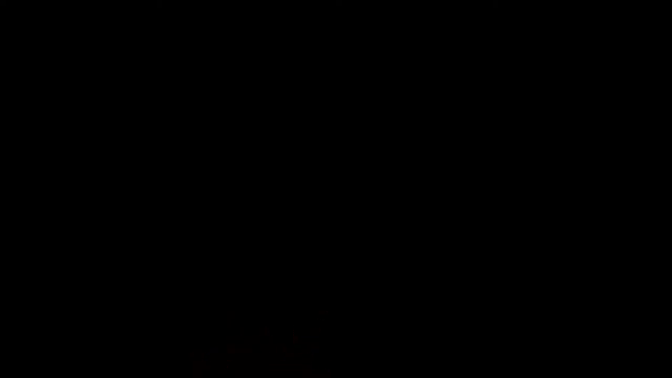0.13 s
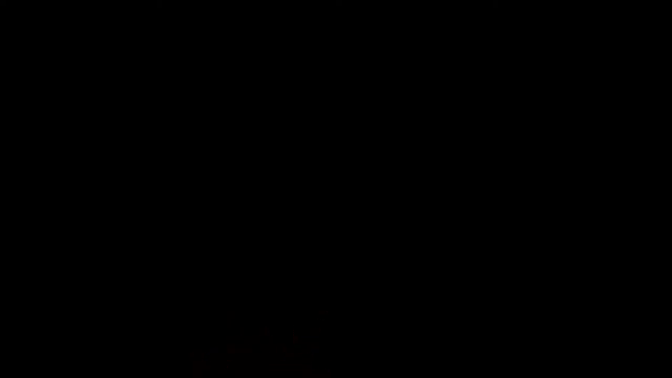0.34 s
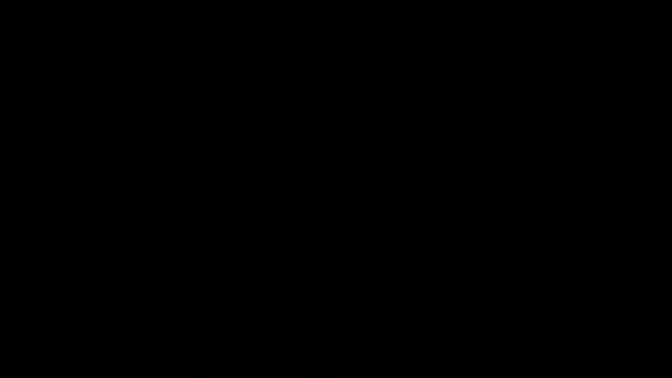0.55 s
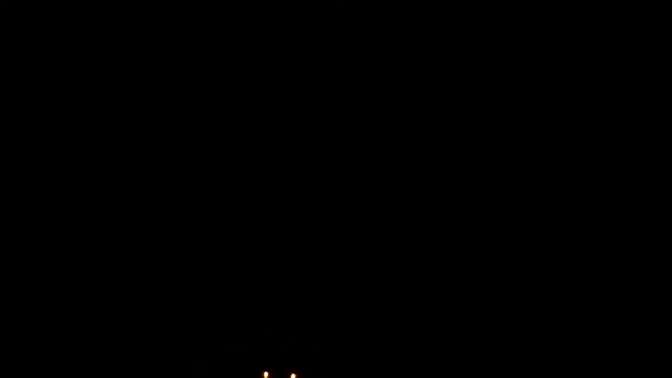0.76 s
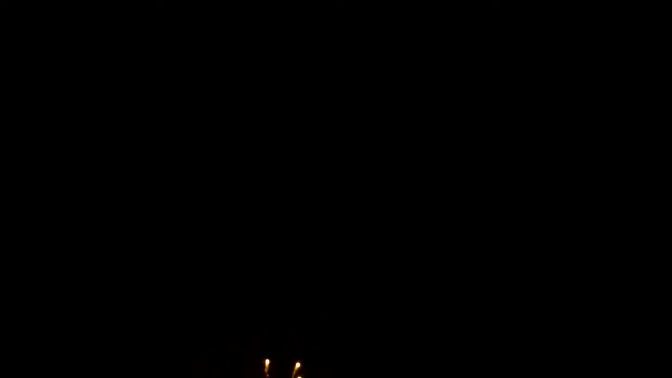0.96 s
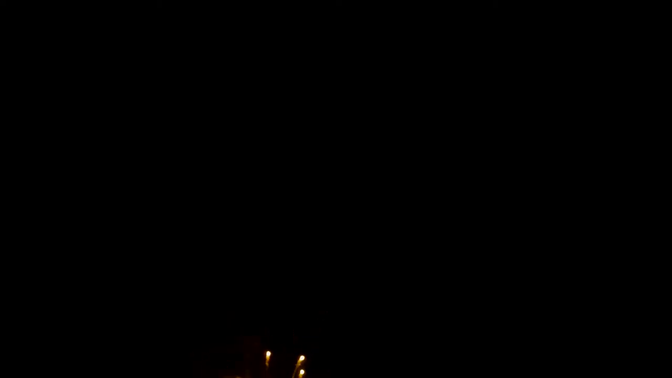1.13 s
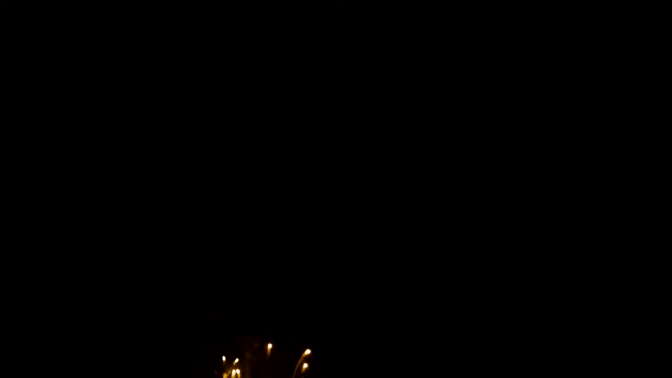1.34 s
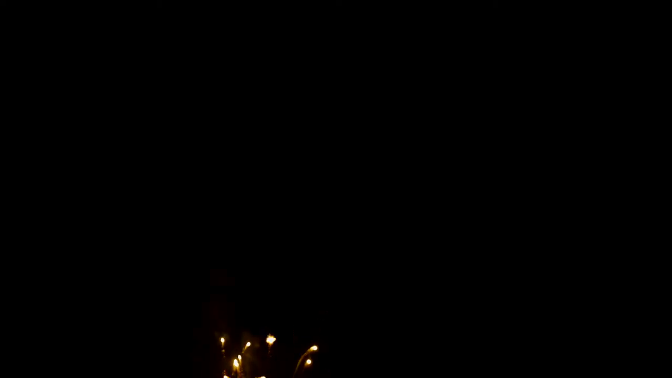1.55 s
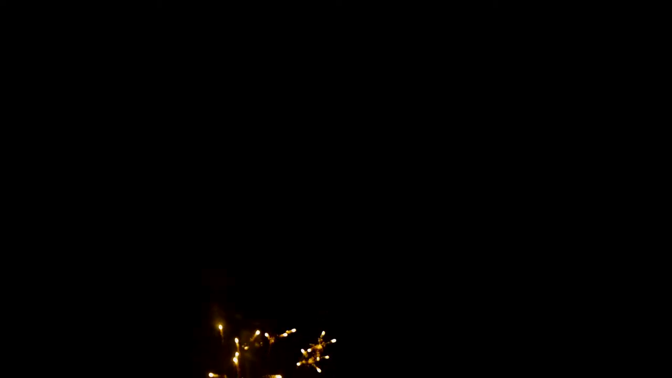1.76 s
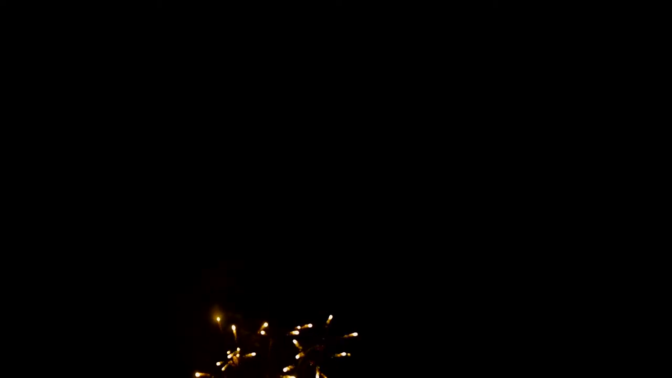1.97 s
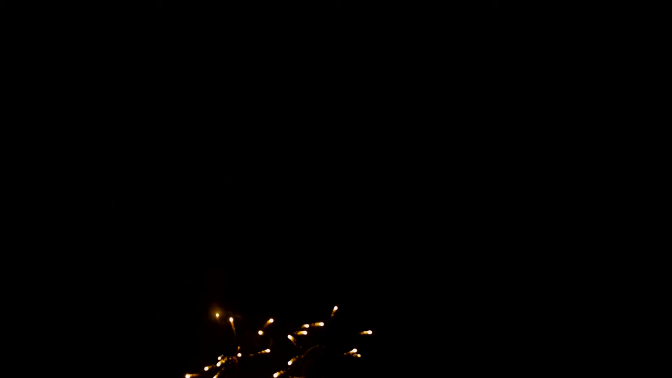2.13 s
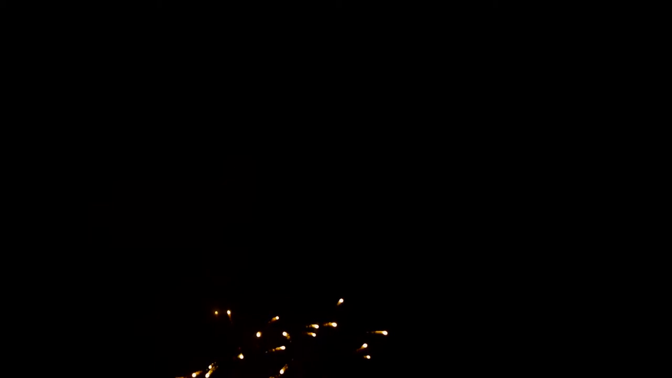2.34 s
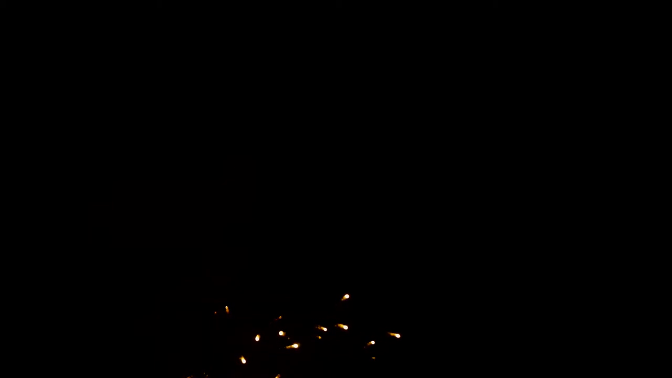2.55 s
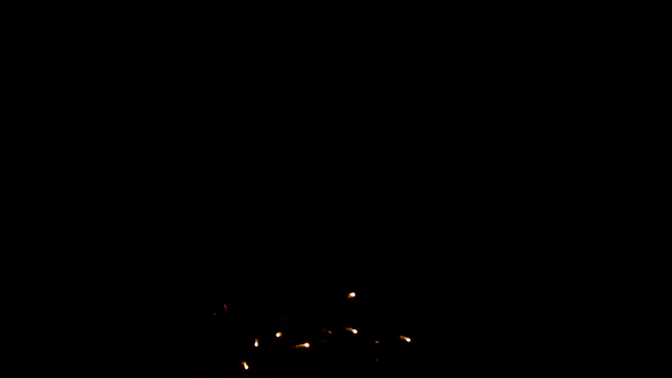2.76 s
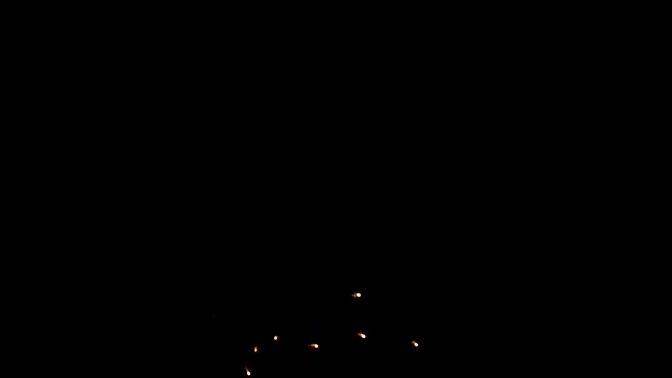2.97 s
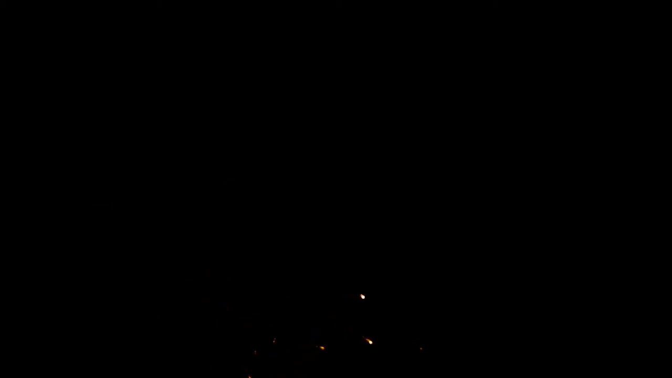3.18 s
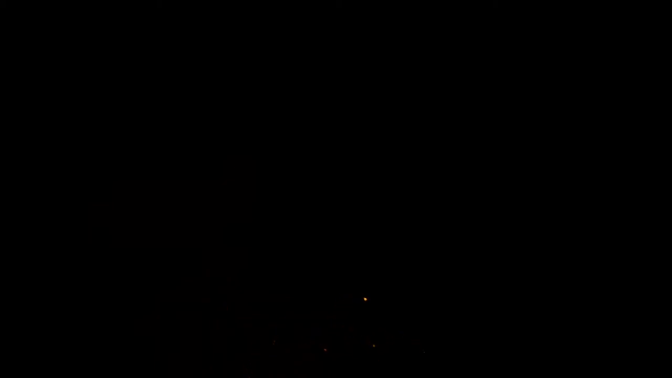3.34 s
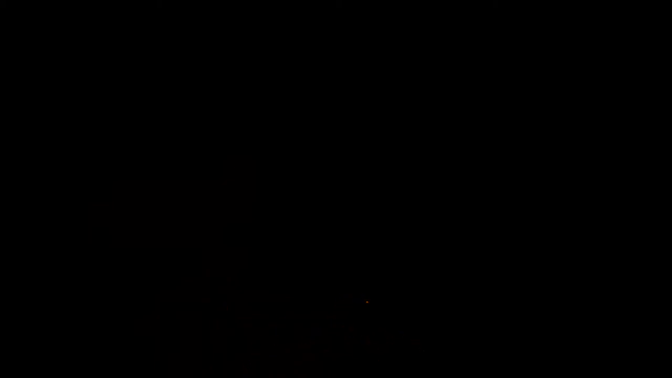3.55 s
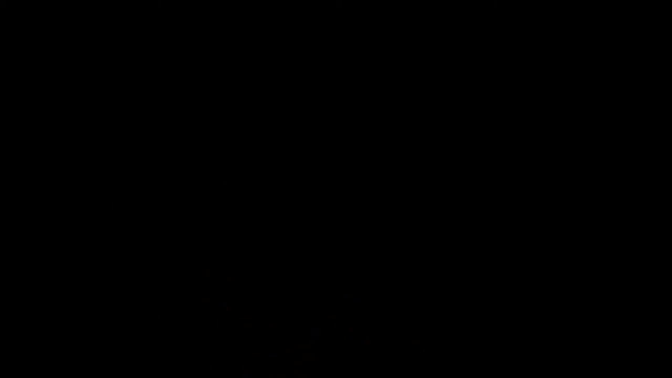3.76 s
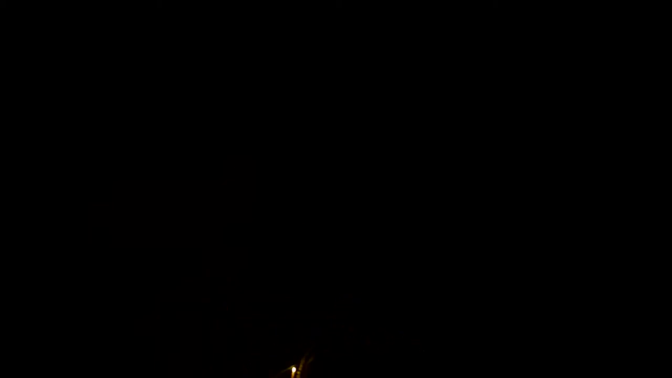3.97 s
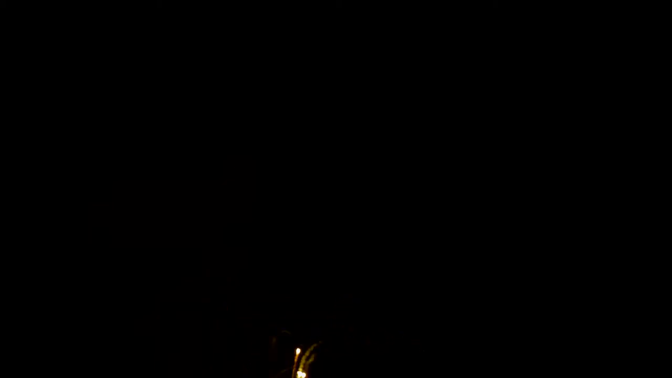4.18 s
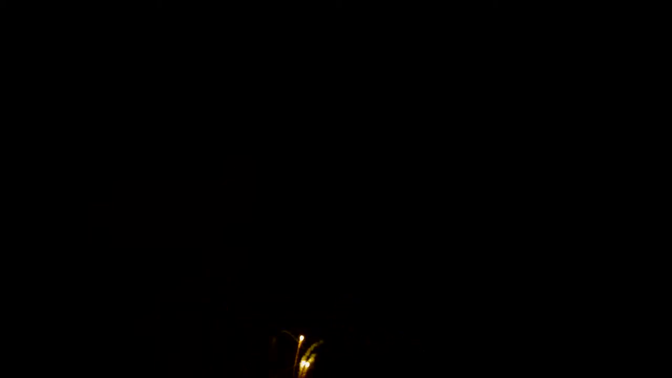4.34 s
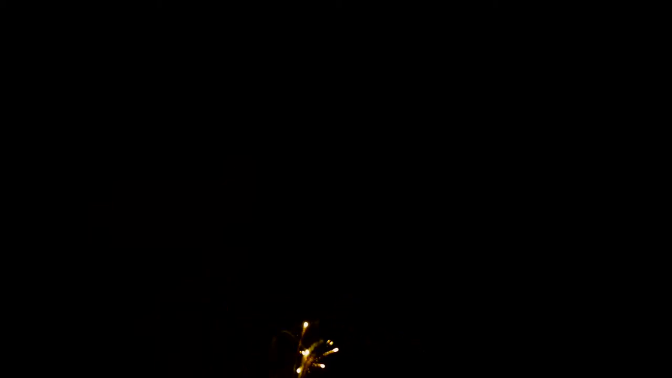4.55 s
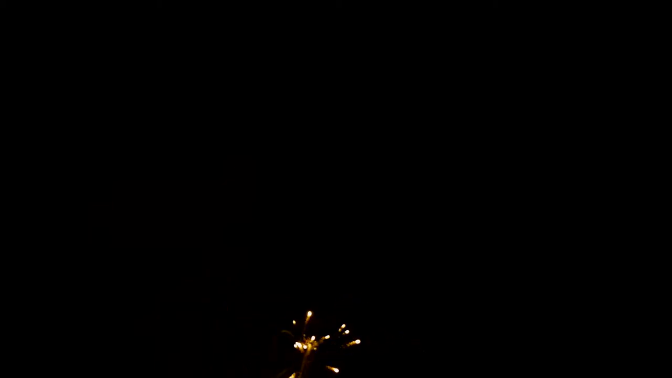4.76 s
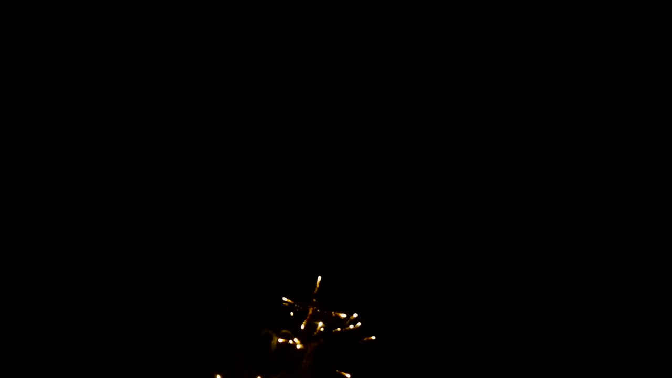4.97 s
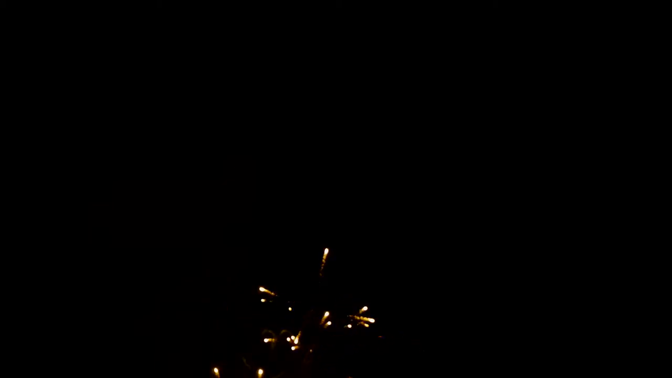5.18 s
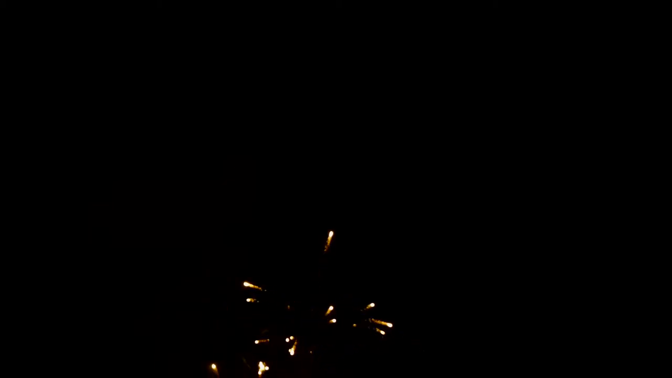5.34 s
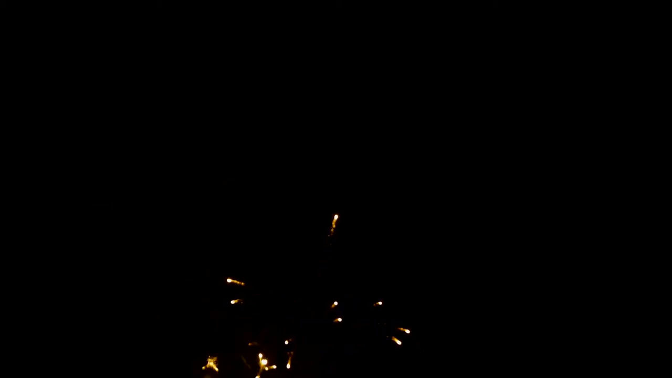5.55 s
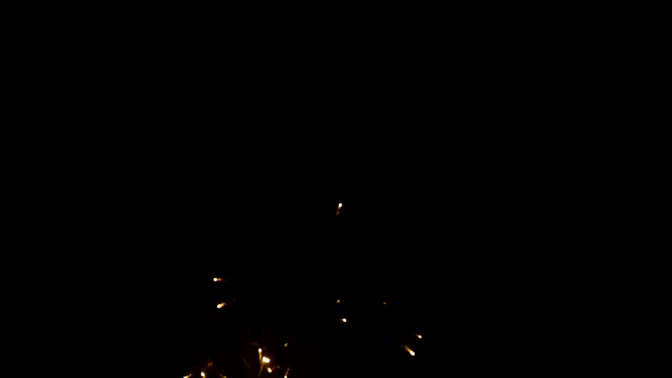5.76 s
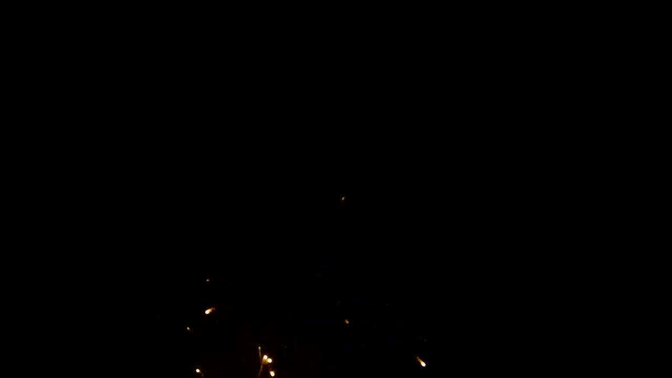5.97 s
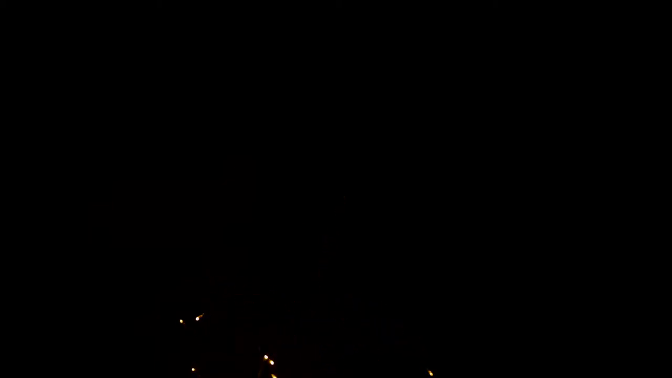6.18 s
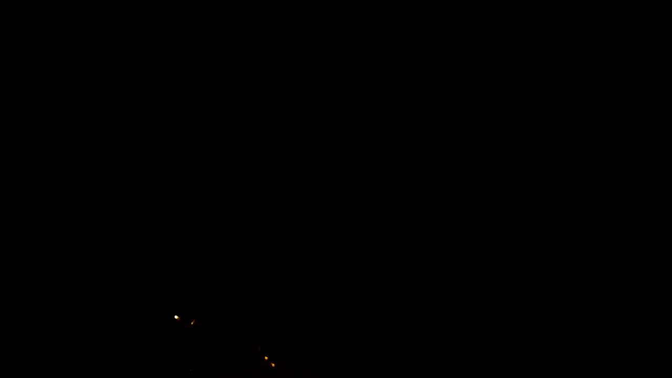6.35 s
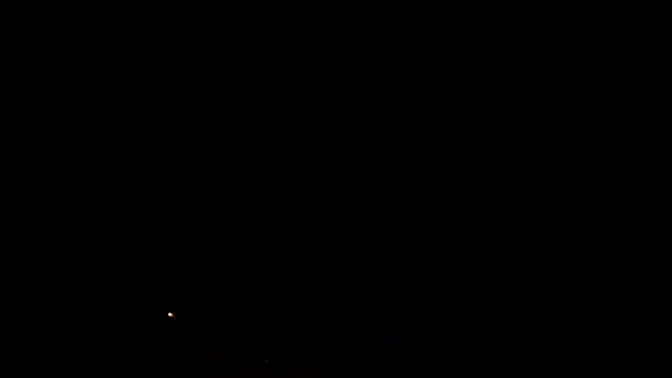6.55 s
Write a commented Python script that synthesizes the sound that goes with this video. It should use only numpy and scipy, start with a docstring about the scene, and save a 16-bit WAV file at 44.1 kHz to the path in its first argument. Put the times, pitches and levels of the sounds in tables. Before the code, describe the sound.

Fireworks pop and crack outdoors at night, heard slightly to the left. About seven sharp reports come in quick, uneven succession, followed by muffled booms from farther away. One lone crack sounds, then another flurry of stronger and weaker pops, with deep distant thuds at the end. The cracks bounce off a wall and fade softly among trees and buildings, with only faint night air behind them.

```python
"""Sharp cracks come in quick clusters: small firework shells bursting over open ground on a still night. Each
is one blast wave, doubled by ground reflection, slapped back by a wall and scattered by trees and buildings
into a long soft tail. Far-off shells thud in between, their treble absorbed by the air, and near the end a
shell's launch gives a faint pop, all over a faint outdoor rumble."""
import sys
import numpy as np
from scipy import signal
from scipy.fft import rfft, irfft, next_fast_len
from scipy.io import wavfile

SR = 44100
rng = np.random.default_rng(int(sys.argv[2]) if len(sys.argv) > 2 else 0)


def pcm_store(signal):
    """Save signal as 16-bit PCM."""
    levels = np.round(np.clip(np.atleast_2d(signal), -1, 1) * 32767)
    wavfile.write(sys.argv[1], SR, levels.astype(np.int16).T)


N = 291501

# Near bursts, the last row (6.318 s) being the faint pop of a shell's launch: start_s, level_db, length_ms,
# ground_gain, air_cutoff_hz, wall_delay_ms
NEAR_SHELLS = [ (0.7523, -18.5, 0.2, 0.56, 3940, 64), (1.0203, -16.5, .26, 0.62, 3920, 65.1),
               (1.3216, -9.5, 0.31, 0.65, 4350, 65.2), (1.4625, -14.5, 0.27, 0.6, 3950, 69.7),
               (1.5666, -11.5, 0.28, 0.55, 4300, 70.6), (1.6620, -12.5, 0.35, 1.3, 3920, 73),
               (1.9322, -10, .27, 0.64, 4000, 66.5), (3.5818, -12, 0.36, 0.63, 4000, 64.5),
               (4.4241, -10, .27, 0.58, 3990, 69), (4.7038, -11, 0.26, 0.56, 4070, 70.5),
               (4.8218, -8, 0.32, 0.72, 4200, 70.3), (4.9060, -18, 0.35, 0.55, 4040, 63.4),
               (5.0205, -16, .42, 0.93, 2840, 65.5), (5.3425, -27.5, 0.29, 0.52, 3130, 79),
               (5.4478, -16, .31, 0.48, 2500, 67), (5.6132, -10.5, 0.31, 0.65, 4110, 65),
               (6.3180, -29, 0.32, 0.34, 910, 70), ]
# Reflections from objects close by: delay_ms, gain_db
NEAR_REFLECTIONS = [(.88, -25), (2.1, -35), (3.0, -23), (9.6, -23), (11.1, -33.5), (24.5, -42)]
# Distant bursts: start_s, level_db, length_ms, air_cutoff_hz, knock_db
FAR_SHELLS = [ (2.1491, -26, 4.7, 72, -39.5), (2.399, -22.5, 3.5, 85.6, -38),
              (2.743, -31.5, 7.5, 105, -37.5), (5.7032, -21.5, 2.26, 61.8, -46),
              (6.0261, -26, 2.9, 103.5, -41.5), (6.291, -18.5, 3.1, 64, -40), ]
# Reverberation of the surroundings: centre_hz, gain_db, t60_s
SCATTER_BANDS = [(60, -19, 2.9), (198, -18.5, 2.1), (410, -19, 2.32), (1060, -17.5, 2.2),
                 (1660, -16.5, 3.6), (2220, -12.5, 3.2), (3470, -23.5, 4.6), (5700, -19.5, 1.2),
                 (7800, -12.5, 0.84), (12700, -16.5, .9)]
# Spectral shape of the night air: frequency_hz, relative_density_db
NIGHT_SPECTRUM = [(15, -20.5), (40, -11), (70, -10.5), (110, -18), (170, -22.5), (280, -22), (420, -20.5),
                  (1000, -25), (1400, -34), (2500, -44), (4500, -56), (5800, -56.5), (7500, -65),
                  (11000, -55.5), (14000, -62)]
# Its stereo balance: frequency_hz, left_minus_right_db
NIGHT_PAN = [(60, 5), (220, 7.5), (440, 2), (900, -0.5), (6000, -1)]
# Its likeness between the channels: frequency_hz, correlation
NIGHT_CORRELATION = [(60, 0.95), (150, 0.93), (380, 0.47), (960, 0.98), (2400, 0.3), (6000, 0.71),
                     (11000, 0.46)]
# Treble lift, broad peaks that brighten the cracks and hiss: centre_hz, quality_factor, gain_db
TREBLE_PEAKS = [(6050, 2.46, 0), (10200, 1.2, -5.5)]

SHELL_PAN_DB, TAIL_PAN_DB = 5.9, 7   # left minus right
USUAL_BLAST_DB, USUAL_WALL_MS = -13, 66
TIME = np.arange(N) / SR
FFT_SIZE = next_fast_len(N)
FREQS = np.arange(FFT_SIZE // 2 + 1) * SR / FFT_SIZE


def near_shells():
    """Multipath propagation: each crack arrives directly, off close objects, off a wall and as a tail."""
    direct, wall, scattered = np.zeros((3, N))
    for start_s, level_db, length_ms, ground_gain, air_hz, wall_ms in NEAR_SHELLS:
        ground_ms = 0.18 + 0.063 * ground_gain   # a stronger bounce trails a little later
        crack = from_db(level_db) * blast(length_ms, air_hz, ground_ms, ground_gain, settling=1.855)
        slap = wall_echo(crack, roughness_db=-4.5, recess_db=-12)
        excess_db = level_db - USUAL_BLAST_DB
        tail_db = 0.4 - 0.48 * excess_db   # the tail's share falls for stronger blasts
        add(direct, start_s, crack)
        add(wall, start_s + wall_ms / 1000, from_db(wall_gain_db(excess_db, wall_ms)) * slap)
        add(scattered, start_s, from_db(tail_db) * crack)
    near = rough_surface(start_s=0.001, decay_s=0.013, level_db=-19)
    for delay_ms, gain_db in NEAR_REFLECTIONS:
        add(near, delay_ms / 1000, from_db([gain_db]))
    # Glancing reflections differ between left and right.
    glancing = rough_surface(start_s=0.0011, decay_s=0.013, level_db=-20.5) * [[1], [-1]]
    early = direct + convolve(low_pass(direct, 2400, order=1), near + glancing) + wall
    tail = surroundings(scattered, onset_s=0.054, early_db=-6, correlation=0.35,
                        flutter_db=4, close_gain=0.36, tree_gain=0.62)
    return pan(SHELL_PAN_DB) * early + pan(TAIL_PAN_DB) * tail


def blast(length_ms, air_hz, ground_ms=0, ground_gain=0, settling=2, air_damping=1.627, size=8192):
    """A blast wave jumps and falls into suction; air absorption rounds it and the ground can repeat it."""
    hz = np.arange(size // 2 + 1) * SR / size
    s = 2j * np.pi * hz
    fall_per_s = 1000 / length_ms
    wave = -SR * s / (s * s + settling * fall_per_s * s + fall_per_s ** 2)   # less settling, more suction
    s_air = 1j * hz / air_hz
    absorption = 1 / (1 + air_damping * s_air + s_air ** 2) ** 2
    bounce = ground_gain * np.exp(-s * ground_ms / 1000) / (1 + (hz / 9000) ** 2)   # dulled by the soil
    return irfft(wave * absorption * (1 + bounce), size)[:size // 2]


def wall_echo(crack, roughness_db, recess_db):
    """Specular reflection from a facade returns the crack thinned; its roughness adds a dull spray."""
    facade = low_pass(rough_surface(start_s=0.00064, decay_s=0.014, level_db=roughness_db), 1800)
    add(facade, 0, np.ones(1))
    add(facade, 0.0053, from_db([recess_db]))   # a recess answers a little later
    thinned = high_pass(low_pass(crack, 3000, order=1), 290, order=1)
    return signal.fftconvolve(thinned, facade)


def wall_gain_db(excess_db, delay_ms):
    """Path loss weakens the echo on longer detours; it also grows more slowly than the blast."""
    gain_db = -15.5 - 0.85 * excess_db - 0.76 * (delay_ms - USUAL_WALL_MS)
    return min(gain_db, -12.5)


def rough_surface(start_s, decay_s, level_db):
    """Diffuse reflection: an uneven surface answers an impulse with a dying spray of tiny echoes."""
    t = TIME[:SR // 5]
    spray = rng.standard_normal(len(t)) * (t > start_s) * np.exp(-t / decay_s)
    return from_db(level_db) * spray / np.linalg.norm(spray)


def surroundings(sound, onset_s, early_db, correlation, flutter_db, close_gain, tree_gain):
    """Scattering by trees and buildings builds a reverberant tail whose highest bands die first."""
    noise, response = stereo_noise(correlation), 0
    log_centres = np.log([row[0] for row in SCATTER_BANDS])
    for weights, (_, gain_db, t60_s) in zip(np.eye(len(SCATTER_BANDS)), SCATTER_BANDS):
        band = to_time(noise * np.interp(np.log(FREQS + 1), log_centres, weights))
        decay_per_s = np.log(1000) / t60_s
        envelope = np.exp(-decay_per_s * TIME) * np.sqrt(2 * decay_per_s / SR)   # unit energy
        response = response + from_db(gain_db) * band * envelope
    close = close_gain * np.exp(-TIME / 0.08)   # the closest reflectors answer loudest
    trees = tree_gain * np.exp(-((TIME - 0.23) / 0.06) ** 2)   # a farther bank of trees rolls back later
    swell = np.where(TIME < onset_s, from_db(early_db), 1 + close + trees)
    flutter = random_gain(flutter_db, per_s=300)   # some reflectors are much larger than others
    return convolve(sound, response * swell * flutter)


def far_shells(bass_cut_hz, rumble_db, rumble_cut_hz):
    """Air absorption over a long path leaves a dull thud with a soft knock on its front."""
    thuds = np.zeros(N)
    for start_s, level_db, length_ms, air_hz, knock_db in FAR_SHELLS:
        add(thuds, start_s, from_db(level_db) * blast(length_ms, air_hz))
        add(thuds, start_s + 0.0035, from_db(knock_db) * blast(length_ms=1.26, air_hz=660))
    # The microphone's bass cut makes each thud swing once more.
    thuds = high_pass(high_pass(thuds, bass_cut_hz), bass_cut_hz)
    rumble = surroundings(high_pass(thuds, rumble_cut_hz), onset_s=0.082, early_db=-2, correlation=0.9,
                          flutter_db=1.5, close_gain=0.1, tree_gain=0.2)
    return pan(SHELL_PAN_DB) * (thuds + from_db(rumble_db) * rumble)


def night_air(level_db, swell_db):
    """Ambient noise: a far rumble, amplitude-modulated in the bass, under faint steady hiss."""
    colour = from_db(at_hz(NIGHT_SPECTRUM, FREQS)) * (FREQS > 12)
    spectrum = stereo_noise(at_hz(NIGHT_CORRELATION, FREQS)) * colour * pan(at_hz(NIGHT_PAN, FREQS))
    bass = to_time(spectrum / (1 + (FREQS / 110) ** 2))
    air = to_time(spectrum) + bass * (random_gain(swell_db, per_s=18) - 1)
    return from_db(level_db) * air / np.std(air.mean(axis=0))


def random_gain(depth_db, per_s):
    """Random amplitude modulation with unit mean power."""
    steps = np.clip(rng.standard_normal(N), -2, 2)
    gain = from_db(depth_db * np.interp(TIME * per_s, np.arange(N), steps))
    return gain / np.sqrt(np.mean(gain ** 2))


def stereo_noise(correlation):
    """Mid-side mixing gives the spectra of two partly correlated white noises."""
    mid, side = rfft(rng.standard_normal((2, FFT_SIZE)))
    return (np.sqrt(1 + correlation) * mid + np.sqrt(1 - correlation) * side * [[1], [-1]]) / np.sqrt(2)


def pan(db):
    """A level difference sets direction: left and right gains whose mean is 1."""
    ratio = from_db(db)
    return np.vstack([ratio, np.ones_like(ratio)]) * 2 / (1 + ratio)


def add(track, start_s, sound):
    """Superposition of a sound on a track."""
    start = int(round(start_s * SR))
    track[start:start + len(sound)] += sound[:N - start]


def convolve(x, response):
    """Convolution with an impulse response in each channel."""
    return signal.fftconvolve(np.atleast_2d(x), np.atleast_2d(response), axes=1)[:, :N]


def low_pass(x, hz, order=2):
    """Causal, maximally flat low-pass."""
    return signal.sosfilt(signal.butter(order, hz, fs=SR, output="sos"), x + 1e-18)


def high_pass(x, hz, order=2):
    """Causal, maximally flat high-pass."""
    return signal.sosfilt(signal.butter(order, hz, "high", fs=SR, output="sos"), x + 1e-18)


def to_time(spectrum):
    """Inverse transform of a spectrum to N samples."""
    return irfft(spectrum, FFT_SIZE)[..., :N]


def at_hz(points, hz):
    """Interpolation on a log-frequency axis."""
    points_hz, values = np.array(points).T
    return np.interp(np.log(hz + 1e-9), np.log(points_hz), values)


def from_db(db):
    """Decibels to amplitude ratio."""
    return 10 ** (np.asarray(db) / 20)


def scene():
    """The pressures of near cracks, far thuds and night air add linearly."""
    cracks = near_shells()
    thuds = far_shells(bass_cut_hz=20.4, rumble_db=11.5, rumble_cut_hz=39)
    return cracks + thuds + night_air(level_db=-69.5, swell_db=1.5)


def record(dry):
    """Treble lift: two broad peaks brighten the cracks and hiss; a steep low-pass limits the bandwidth."""
    lift = sum(from_db(gain_db) * signal.lfilter(*signal.iirpeak(hz, q, fs=SR), dry)
               for hz, q, gain_db in TREBLE_PEAKS)
    top_cut = signal.ellip(10, 0.1, 80, 16400, fs=SR, output="sos")
    return signal.sosfilt(top_cut, dry + lift)


dry = scene()
out = record(dry)
pcm_store(out)
```